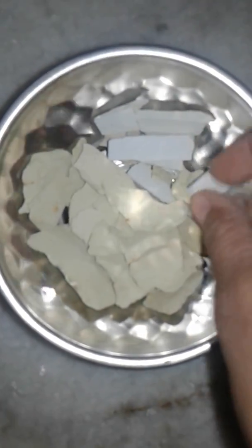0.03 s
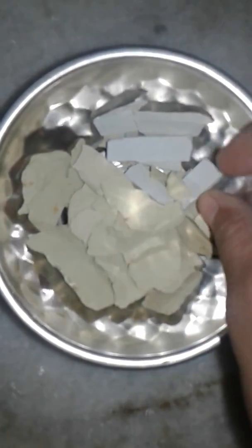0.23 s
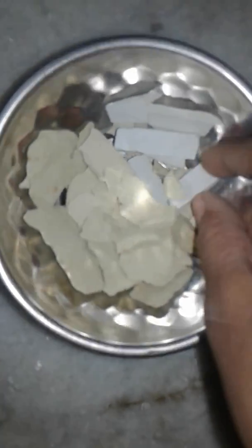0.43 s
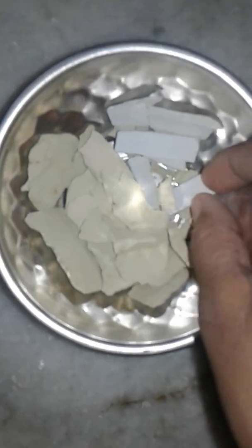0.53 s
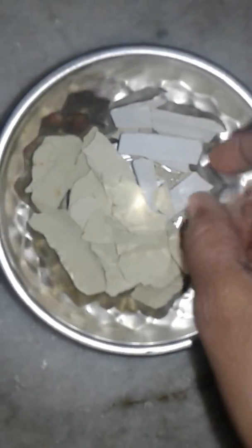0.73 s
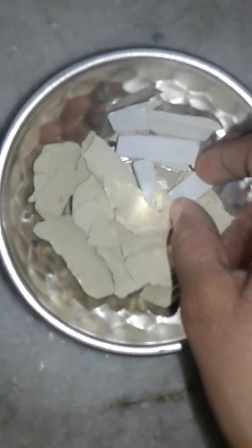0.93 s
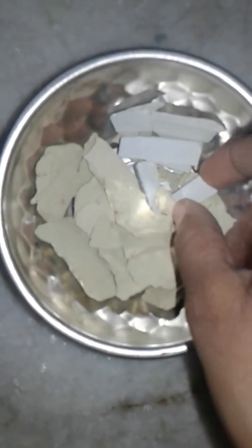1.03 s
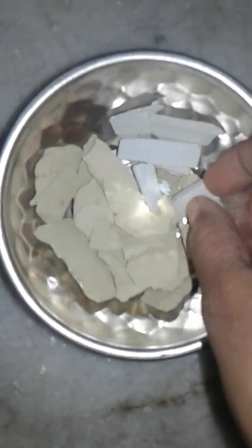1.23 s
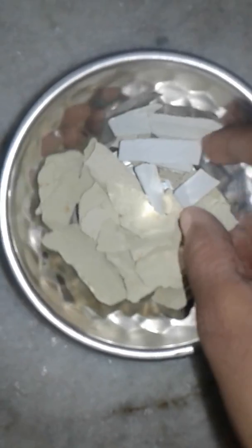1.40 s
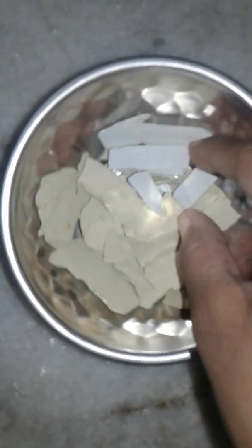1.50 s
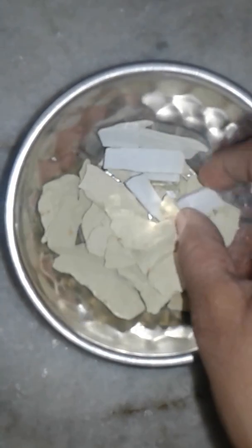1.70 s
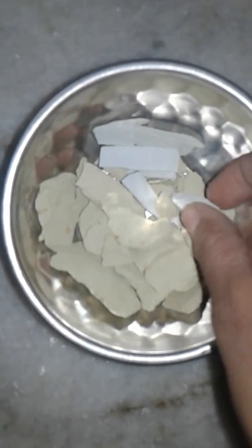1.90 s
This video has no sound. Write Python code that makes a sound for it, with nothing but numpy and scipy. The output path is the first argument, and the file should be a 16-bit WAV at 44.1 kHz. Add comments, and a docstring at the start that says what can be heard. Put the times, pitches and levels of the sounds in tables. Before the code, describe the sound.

Fingers shift flat, brittle pieces around a metal bowl, making dry clicks and a clink.

```python
"""Fingers shift flat, brittle, chalky pieces in a steel bowl in a quiet room. The pieces click together, each
impact exciting their brief modes; at 0.2 s one clinks hard on the bowl and sets it ringing. They slide with a
gritty stick-slip rustle and dry ticks, and fingers thud softly. At 1.1 s a piece snaps. Among further clicks an
edge scrapes, and last a held piece taps down dryly. A low electric hum and soft room noise lie under it all."""
import sys
import numpy as np
from scipy import signal
from scipy.fft import rfft, irfft
from scipy.io import wavfile

SR = 44100
rng = np.random.default_rng(int(sys.argv[2]) if len(sys.argv) > 2 else 0)


def materialize(psi):
    """Save the field psi as 16-bit PCM at rate SR to the path in sys.argv[1].

    A 1-D psi becomes a single channel; in a 2-D psi each row is a channel.
    """
    bounded = np.clip(np.atleast_2d(psi).T, -1, 1)
    quanta = np.round(bounded * 32767).astype(np.int16)
    wavfile.write(sys.argv[1], SR, quanta)


N = 85995
T = np.arange(N) / SR

# impacts between pieces: (t/s, crack level/dB, treble gain/dB, pitch f/Hz, ring level/dB, t60/s)
CLICKS = [(.0361, -45, 4, 3330, -46, .11), (0.128, -32.5, -1, 5000, -38.5, 0.042),
          (0.161, -29.5, -18, 6080, -41.5, 0.031), (0.1751, -45, -10, 1440, -33.5, 0.0093),
          (.2305, -37, -15, 3700, -28, 0.033), (0.3798, -39, 2, 6900, -39, 0.024),
          (0.4045, -43, 9, 3665, -39.5, 0.046), (0.5283, -35.5, 6, 2850, -43, 0.048),
          (0.5745, -22.5, -16, 3730, -24, 0.0092), (0.745, -25.5, -2, 3720, -34, 0.045),
          (1.2551, -25, -4, 3210, -29.5, 0.029), (1.2655, -36, -3, 3140, -24, 0.012),
          (1.559, -40, 6, 1780, -41.5, 0.018), (1.5782, -31, 1, 3850, -34, 0.027)]
# modes of a flat piece: (ratio to its pitch, gain/dB, share of its t60)
PIECE_MODES = [(0.8, -2, 0.49), (1.002, 5.5, 1), (1.16, -3.5, 1), (1.34, -1.5, 0.6), (1.7, -13, 0.94)]
# spectrum of a contact's crack: (f/Hz, gain/dB)
CRACK_SPECTRUM = [(100, -61), (450, -21.5), (950, -19.5), (1800, -14), (2900, -3), (4500, -6), (6100, 7.5),
                  (7900, -5.5), (9400, -7.5), (11500, -14.5), (16000, -22)]
# modes of the piece that hits the bowl: (f/Hz, level/dB, t60/s)
CLINK_MODES = [(2880, -9, 0.008), (3690, -14.5, 0.056), (5830, -16.5, 0.02), (6954, -19.5, 0.039),
               (9300, -22, 0.042), (10280, -31.5, 0.086)]
# modes of the piece that snaps: (f/Hz, level/dB, t60/s)
SNAP_MODES = [(1413, -26, 0.019), (2304, -25.5, 0.016), (3980, -22.5, 0.0083), (4730, -24, 0.0065),
              (5240, -22, 0.011), (6430, -19, 0.0052), (8800, -31, 0.008), (10670, -33, 0.0065)]
# lasting modes of the bowl: (f/Hz, gain/dB, t60/s)
BOWL_MODES = [(2400, -48, .3), (2681, -53, .6), (2810, -44, .75), (2880, -43.5, .75), (3260, -30, .38),
              (3306, -37, .42), (3589, -39, .27), (3688, -32, .32), (5886, -46, .33), (6902, -42, .24)]
# spectrum of the bowl's dense modes: (f/Hz, gain/dB)
SHIMMER_SPECTRUM = [(500, -13.5), (1900, 5), (3000, -4.5), (4300, 1.5), (7000, -2.5), (10000, -4),
                    (15000, -10)]
# envelope of the sliding rustle, before brightening: (t/s, level/dB)
SLIDE_ENVELOPE = [(.11, -58.5), (.16, -49), (.36, -58), (.46, -48.5), (.51, -55.5), (.54, -45),
                  (.67, -59.5), (.78, -54), (.89, -49), (.99, -61), (1.40, -57), (1.53, -48.5),
                  (1.66, -46.5), (1.69, -55), (1.76, -48), (1.86, -51), (1.95, -58)]
# spectrum of the rustle: (f/Hz, gain/dB)
GRIT_SPECTRUM = [(150, -10), (500, -5.5), (950, -13), (2200, -14), (3200, 1), (4400, -6), (6000, 2),
                 (8000, -7), (10500, -15.5), (16000, -19.5)]
# a held piece taps down: (t/s, level/dB, t60/s)
TAPS = [(1.7173, -27.5, 0.021), (1.786, -31, .009), (1.8235, -25, 0.014)]
# spectrum of a tap: (f/Hz, gain/dB)
TAP_SPECTRUM = [(1800, -21), (2300, -0.5), (3000, 3.5), (3800, -0.5), (4500, -15), (15000, -44)]
# an edge scrapes over the heap: (t/s, longest duration/s, first slip's level/dB)
SCRAPES = [(1.414, 0.015, -38), (1.427, 0.018, -30)]
# spectrum of a scrape: (f/Hz, gain/dB)
SCRAPE_SPECTRUM = [(2400, -26), (3800, -6), (5000, -6), (6000, 3.5), (8000, -15.5), (9100, -6),
                   (10200, -28), (16000, -28)]
# short, dry clicks of pieces touching: (t/s, level/dB)
TICKS = [(.041, -41), (.0701, -43.5), (.1452, -34.5), (.1905, -35), (.2455, -34), (.4463, -46), (.546, -37),
         (.5585, -40), (.5885, -38.5), (.6363, -45.5), (.7192, -37.5), (.7795, -42), (.7995, -42),
         (.8224, -31.5), (.8972, -45), (.9135, -38), (1.0222, -41), (1.037, -50), (1.2448, -37),
         (1.6057, -34.5), (1.656, -34), (1.7504, -42), (1.8385, -43)]
# spectrum of a tick: (f/Hz, gain/dB)
TICK_SPECTRUM = [(1800, -18), (3300, 2), (4500, -1.5), (6200, 3), (10000, -12.5), (16000, -19.5)]
# soft finger thuds: (t/s, level/dB)
KNOCKS = [(.176, -37.5), (.381, -45.5), (.754, -39.5), (1.272, -49), (1.576, -40.5), (1.718, -47.5)]
# spectrum of a knock: (f/Hz, gain/dB)
KNOCK_SPECTRUM = [(150, -43), (480, 5.5), (1500, 3.5), (4000, -45)]
# partials of the hum: (f/Hz, rms level/dB)
HUM_PARTIALS = [(131.3, -61), (175.2, -59), (263, -71), (350.4, -67)]
# spectrum of the room noise: (f/Hz, gain/dB)
AIR_SPECTRUM = [(30, -29), (52, 1), (105, -0.5), (135, 9.5), (160, 0.5), (480, -5.5), (900, -17.5),
                (3300, -13.5), (6000, -18), (9000, -25)]

CLINK_S, SNAP_S = 0.197, 1.0822
TREBLE_FROM_HZ, TREBLE_FULL_HZ = 6600, 8660


def clicks(scatter=0.68, size=8192):
    """Impact excites free vibration; irregular outlines detune the modes. Returns cracks and rings."""
    cracks, rings = np.zeros((2, N))
    for s, crack_db, treble_db, hz, ring_db, t60 in CLICKS:
        modes = []
        for ratio, db, life in PIECE_MODES:
            detune = 1 + abs(ratio - 1) * scatter * rng.uniform(-0.67, 1)
            modes.append((hz * ratio * detune, ring_db + db, t60 * life))
        add(cracks, s, crack(crack_db, t60, treble_db))
        add(rings, s, ring(modes, T[:size]) * attack(T[:size], t60))
    return cracks, rings


def blow(s, modes, db, t60, treble_db=0):
    """Impulsive excitation: a hard hit or a fracture gives a crack and a ring. Returns both."""
    cracks, rings = np.zeros((2, N))
    add(cracks, s, crack(db, t60, treble_db))
    add(rings, s, ring(modes, T) * attack(T, t60))
    return cracks, rings


def crack(db, t60, treble_db=0, spectrum=CRACK_SPECTRUM, size=8192):
    """Modal overlap: the many short-lived modes of a contact merge into a burst of noise."""
    envelope = fade(T[:size], t60) * attack(T[:size], t60)
    burst = colour(rng.standard_normal(size) * envelope, spectrum)
    burst = colour(burst, [(TREBLE_FROM_HZ, 0), (TREBLE_FULL_HZ, treble_db)])
    return from_db(db) * rms_one(burst) * np.sqrt(np.mean(envelope ** 2))


def ring(modes, t):
    """Superposition: a struck body's motion is a sum of damped sines, here of alternating sign."""
    return sum((-1) ** k * from_db(db) * fade(t, t60) * np.sin(2 * np.pi * hz * t)
               for k, (hz, db, t60) in enumerate(modes))


def bowl(light, clink_crack, coupling_db=-21.5, modes_db=0.5, shimmer_db=-4, rise_s=0.029):
    """Resonance: contacts drive the steel's clear modes and a dense shimmer that swells and dies."""
    drive = from_db(coupling_db) * light
    add(drive, CLINK_S, np.ones(1))  # the clink acts as a unit impulse
    clear = convolve(drive, ring(BOWL_MODES, T))
    envelope = fade(T, t60=0.28) * np.minimum(T / rise_s, 1)
    dense = colour(rng.standard_normal(N) * envelope, SHIMMER_SPECTRUM) / np.sqrt(np.sum(envelope ** 2))
    shimmer = convolve(light + clink_crack, dense)
    return from_db(modes_db) * clear + from_db(shimmer_db) * shimmer


def rustle(peak_slips_per_s=1500, spread_db=3, brightening=0.92):
    """Sliding friction: rough faces move in tiny slips, denser, louder and brighter with force."""
    level = from_db(np.interp(T, *np.transpose(SLIDE_ENVELOPE)))
    force = level / level.max()
    onsets = rng.random(N) < peak_slips_per_s * np.sqrt(force) / SR
    sizes = from_db(spread_db * np.minimum(rng.exponential(1, N), 5))
    energy = np.abs(convolve(onsets * sizes ** 2, fade(T, t60=0.012) ** 2))  # slips add in energy
    grit = rms_one(colour(np.sqrt(energy) * rng.standard_normal(N), GRIT_SPECTRUM))
    treble = signal.sosfiltfilt(signal.butter(2, TREBLE_FULL_HZ, "high", fs=SR, output="sos"), grit)
    return level * (grit + treble * ((2 * force) ** brightening - 1))


def taps():
    """Damping: fingers stop a held piece's vibration at once, leaving a broad, dry click."""
    out = np.zeros(N)
    for s, db, t60 in TAPS:
        add(out, s, crack(db, t60, spectrum=TAP_SPECTRUM))
    return out


def scrapes(max_slips=12, mean_gap_s=0.0015, fade_db_per_s=296):
    """Stick-slip motion: an edge catches and lets go at uneven intervals, weakening as it goes."""
    out = np.zeros(N)
    for s, duration, db in SCRAPES:
        gaps = mean_gap_s * (0.5 + rng.random(max_slips))
        for t in np.cumsum(gaps) - gaps[0]:
            slip = crack(db - fade_db_per_s * t, t60=0.019, spectrum=SCRAPE_SPECTRUM)
            add(out, s + t, (t < duration) * slip)
    return out


def ticks():
    """Contact transients: short, dry clicks of pieces touching."""
    out = np.zeros(N)
    for s, db in TICKS:
        add(out, s, crack(db, t60=0.025, spectrum=TICK_SPECTRUM))
    return out


def knocks():
    """Damped impact: fingers thud softly against the pieces, dulled by the hand."""
    out = np.zeros(N)
    for s, db in KNOCKS:
        add(out, s, crack(db, t60=0.027, spectrum=KNOCK_SPECTRUM))
    return out


def room(x, gain_db=-18, t60=0.58, delay_s=0.0015):
    """Reverberation: reflections from the walls merge into a short, diffuse tail."""
    tail = rng.standard_normal(N) * fade(T, t60) * (T > delay_s)
    tail /= np.sqrt(np.sum(tail ** 2))
    tail = colour(tail, [(2000, 7.5), (7000, 0), (15000, -51)])
    return from_db(gain_db) * convolve(x, tail)


def background(air_db=-57.5, waver_depth=0.06, waver_hz=5.5):
    """Forced vibration: a motor hums in slightly wavering partials over soft room noise."""
    out = from_db(air_db) * rms_one(colour(rng.standard_normal(N), AIR_SPECTRUM))
    for hz, db in HUM_PARTIALS:
        amplitude = from_db(db) * np.sqrt(2) * (1 + waver_depth * drift(waver_hz))
        out += amplitude * np.sin(2 * np.pi * (hz * T + rng.random()))
    return out


def drift(hz):
    """Low-pass noise: slow random movement of unit rms, rolling off above the given rate."""
    return rms_one(colour(rng.standard_normal(N), [(hz, 0), (10 * hz, -90)]))


def attack(t, t60, share=0.035):
    """Exponential build-up: its time constant is a share of t60, so brief contacts start faster."""
    return 1 - np.exp(-t / (share * t60))


def fade(t, t60):
    """Exponential decay: 60 dB in t60."""
    return 1000.0 ** (-t / t60)


def colour(x, spectrum):
    """Minimum-phase filtering: apply a (f/Hz, gain/dB) curve so that nothing sounds early."""
    hz, db = np.transpose(spectrum)
    bin_hz = np.maximum(np.abs(np.fft.fftfreq(len(x))) * SR, 1)
    log_gain = np.log(from_db(np.interp(np.log(bin_hz), np.log(hz), db)))
    response = np.exp(np.conj(signal.hilbert(log_gain)))
    return irfft(rfft(x) * response[:len(x) // 2 + 1], len(x))


def convolve(x, response):
    """Convolution: pass a sound through an impulse response."""
    return signal.fftconvolve(x, response)[:N]


def add(out, s, sound):
    """Superposition: mix a sound in at s seconds."""
    i = int(s * SR)
    out[i:i + len(sound)] += sound[:N - i]


def from_db(db):
    """Decibel law: level to amplitude ratio."""
    return 10 ** (np.asarray(db) / 20)


def rms_one(x):
    """Normalisation: scale to unit rms."""
    return x / np.sqrt(np.mean(x ** 2) + 1e-20)


def scene():
    """Coupling: loose contacts drive the bowl, held pieces do not; all of them excite the room."""
    cracks, rings = clicks()
    clink_crack, clink_ring = blow(CLINK_S, CLINK_MODES, db=-12, t60=0.025)
    snap = sum(blow(SNAP_S, SNAP_MODES, db=-29.5, t60=0.019, treble_db=-8))
    light = cracks + ticks() + rustle()
    held = snap + taps() + scrapes()
    direct = light + rings + clink_crack + clink_ring + bowl(light, clink_crack) + held + knocks()
    return (direct + room(direct) + background())[None]


def record(dry, low_cut_hz=36, high_cut_hz=15800):
    """Band limiting: the microphone sheds the deepest bass, and the top is cut steeply."""
    x = signal.sosfilt(signal.butter(4, low_cut_hz, "high", fs=SR, output="sos"), dry)
    return signal.sosfilt(signal.ellip(10, 0.1, 80, high_cut_hz, fs=SR, output="sos"), x)


dry = scene()
out = record(dry)
materialize(out)
```